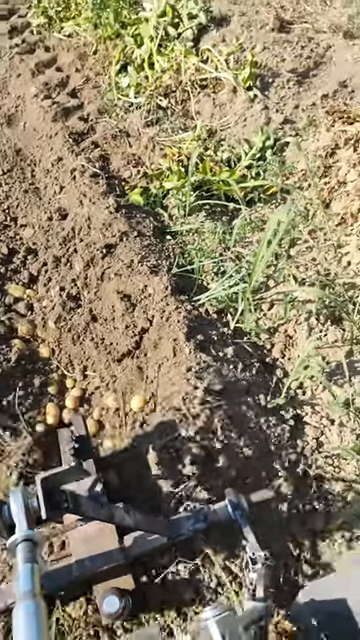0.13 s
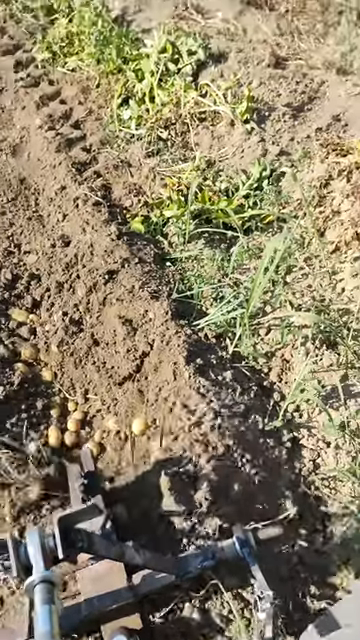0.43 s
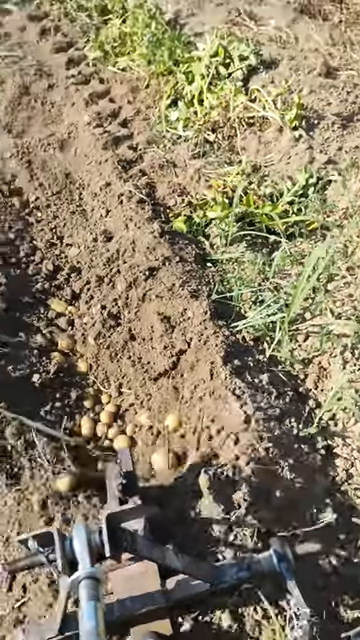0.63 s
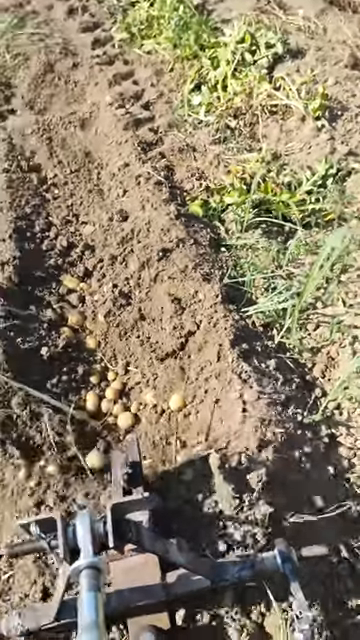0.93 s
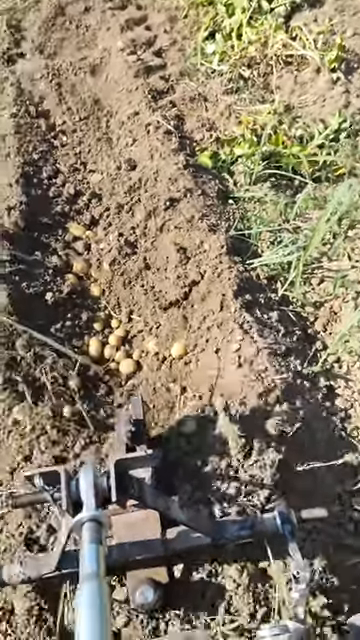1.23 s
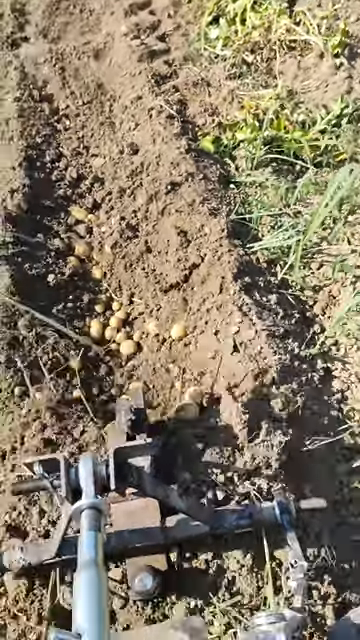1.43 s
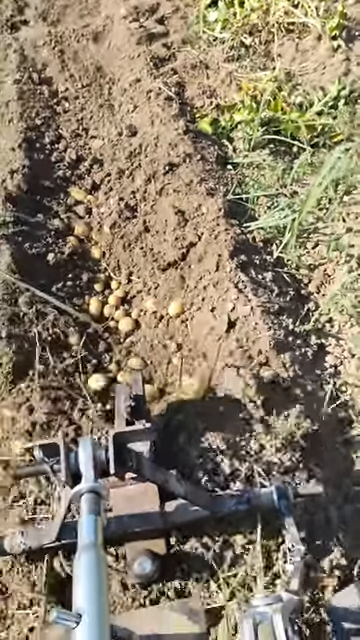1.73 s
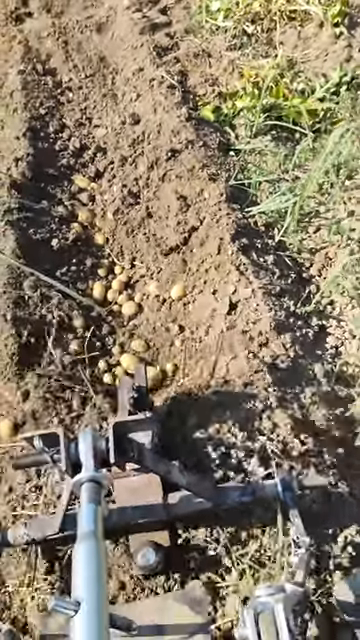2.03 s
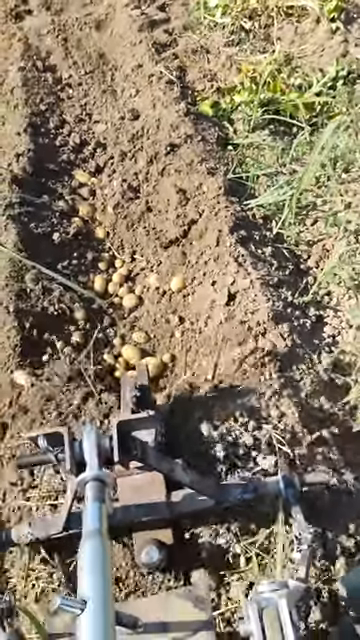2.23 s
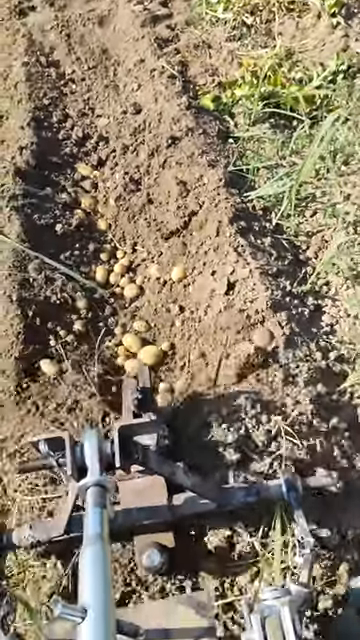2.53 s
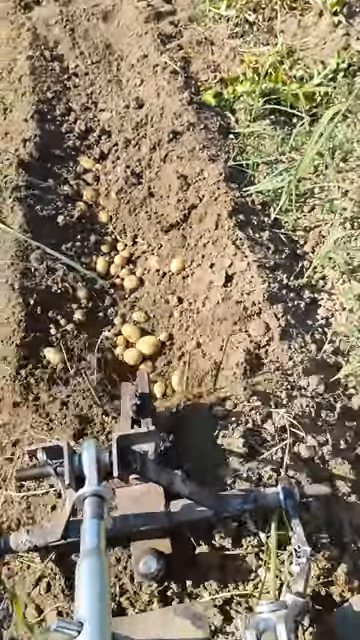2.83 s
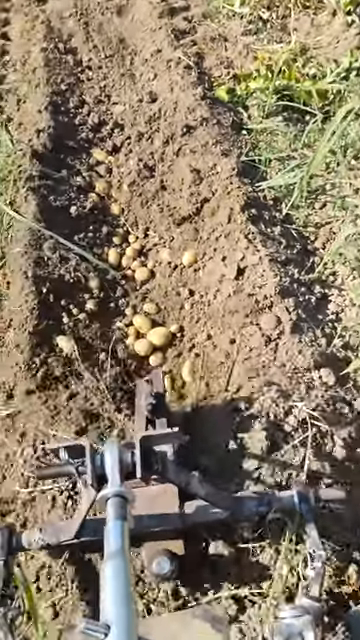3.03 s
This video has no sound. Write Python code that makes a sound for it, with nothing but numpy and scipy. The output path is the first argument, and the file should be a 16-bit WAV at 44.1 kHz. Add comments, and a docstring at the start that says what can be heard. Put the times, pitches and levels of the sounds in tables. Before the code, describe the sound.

Close outdoor stereo pickup of a tractor motor recovering from a brief slowdown, then droning steadily; behind it a metal digger buzzes and clinks, faint soil crumbs patter, and a stone scrapes just before two seconds.

```python
"""Tractor pulling a potato digger

A small diesel tractor drags a digger through dry soil. The engine recovers from a sag in speed:
steady tones make its hum and whine, shaped noise its knock and rumble. Jittered blows in step with
it rattle the digger's ringing steel frame. Crumbs patter, clods thump and a stone grinds and pings."""
import sys
import numpy as np
from scipy import signal
from scipy.fft import rfft, irfft, next_fast_len
from scipy.io import wavfile
from scipy.ndimage import uniform_filter1d, map_coordinates

SR = 44100
rng = np.random.default_rng(int(sys.argv[2]) if len(sys.argv) > 2 else 0)


def dump(signal):
    """Clip the signal to [-1, 1] and save it as 16-bit WAV at the path in sys.argv[1]."""
    limited = np.clip(np.atleast_2d(signal).T, -1, 1)
    pcm = np.round(limited * 32767).astype(np.int16)
    wavfile.write(sys.argv[1], SR, pcm)


N = 140238  # length [samples]


# Engine speed: (time [s], rate [firings per s])
SPEED = [(0.0, 21.06), (0.25, 21.7), (0.45, 21.03), (0.65, 23.2), (0.85, 25.0), (1.1, 25.77), (1.45, 25.57),
         (1.75, 24.91), (2.0, 24.38), (2.3, 25.2), (2.6, 25.91), (2.9, 26.1), (3.18, 25.66)]


def firing_count():
    """Adding up the firing rate gives the running count of firings, which times the whole engine."""
    return np.cumsum(curve(SPEED)) / SR


# Exhaust hum before the pipe and level curves: (multiple of the firing rate, level [dB])
HUM_ORDERS = [(2, -59), (3, -45), (5, -45.5), (6, -46), (7, -49.5), (9, -51.5), (10, -38.5), (11, -40.5),
              (14, -49.5), (15, -55.5)]
# Exhaust resonances that the hum slides through: (frequency [Hz], gain [dB])
PIPE = [(50, 0), (64, -7.5), (77, 0), (105, -2), (128, 0.5), (148, 2), (175, 0.5), (215, -14), (250, -1),
        (272, -17), (295, 6), (330, 1.5)]
# Rise and fall of the hum: (time [s], level [dB])
HUM_LEVEL = [(0, 1), (.25, -1.5), (.36, 1.5), (.74, 2.5), (.84, 1.5), (1.6, -2.5), (2.1, 0.5), (3.18, 1)]
# Gear whine before the radiation and level curves: (multiple of the firing rate, level [dB])
WHINE_ORDERS = [(41, -1), (54, -7), (55, 16), (58, -8), (69, -20)]
# Rise and fall of the whine: (time [s], level [dB])
WHINE_LEVEL = [(0, -70), (.85, -66), (1.0, -57), (1.85, -53), (2.1, -63), (2.45, -47.5), (3.18, -55)]
# Relative strength of each of the three cylinders' knocks: (level [dB])
CYLINDERS = [-1.6, -1.1, 1.9]
# Clacks of combustion and valve gear: (place between firings [0-1], relative level [dB])
CLACKS = [(.61, -9.5), (0.729, -13), (0.98, -11.5)]
# Tone colour of the knocking block: (frequency [Hz], relative level [dB per Hz])
BLOCK = [(400, -19), (950, 10.5), (1250, 1.5), (1800, 4.5), (2400, 2.5), (2900, -4), (3600, -19.5),
         (4600, -16.5), (5400, -20), (6500, -18), (9000, -28), (11000, -28), (12500, -23.5), (16000, -26)]
# Knocking, hardest while the engine picks up speed: (time [s], level [dB])
KNOCK_LEVEL = [(0, -40), (.55, -41), (.87, -39.5), (.95, -38.5), (1.4, -41.5), (2.4, -40), (3.18, -42)]
# Tone colour of the low rumble: (frequency [Hz], relative level [dB per Hz])
RUMBLE = [(20, -35), (36, -26), (62, -7), (100, -7), (140, -10.5), (200, -0.5), (270, 1), (330, -0.5),
          (450, -12), (680, 3), (900, -4.5), (1250, -7), (3000, -59.5)]
# Rise and fall of the rumble: (time [s], level [dB])
RUMBLE_LEVEL = [(0, -28.5), (.45, -35), (.7, -31.5), (.87, -32.5), (1.2, -29), (1.6, -28.5), (2.1, -29.5),
                (3.18, -30)]
KNOCK_BED, KNOCK_RISE_S, KNOCK_DECAY_S = .2, .0019, .007  # the bed is steady noise between knocks
CHUG_DB, CHUG_PLACE = 1, .27  # the rumble swells this much, at this place between firings


def engine(firings):
    """The exhaust hums and chugs, the gears whine; three cylinders clack in turn, one harder."""
    count = len(CYLINDERS)
    hits = np.zeros(N)
    for place, db in CLACKS:
        for k, strength in enumerate(CYLINDERS):
            turns = (firings - place - k) / count
            hits += amp(db + strength) * blows(turns, scatter_db=1, jitter_s=.0006)
    clacks = dying(hits, KNOCK_RISE_S, KNOCK_DECAY_S)
    knock = hiss(np.hypot(KNOCK_BED, 1.5 * clacks), BLOCK)
    chug = amp(CHUG_DB * np.cos(2 * np.pi * (firings - CHUG_PLACE)))
    rumble = hiss(chug, RUMBLE)
    hum = harmonics(firings, HUM_ORDERS, PIPE, waver_db=2.5)
    whine = harmonics(firings, WHINE_ORDERS, RADIATION, waver_db=4)
    tones = amp(curve(HUM_LEVEL)) * hum + amp(curve(WHINE_LEVEL)) * whine
    noises = amp(curve(KNOCK_LEVEL)) * knock + amp(curve(RUMBLE_LEVEL)) * rumble
    return tones + noises


def harmonics(firings, orders, colour, waver_db):
    """Slightly unsteady multiples of the firing rate, placed in the shared part only."""
    total, speed = np.zeros(N), curve(SPEED)
    for order, db in orders:
        tone = np.sqrt(2) * np.sin(2 * np.pi * (order * firings + rng.random()))
        level = db + along(colour, order * speed) + waver_db * wobble(4.92)
        total += amp(level) * tone
    return np.array([total, np.zeros(N)])


# Extra-hard knocks, before the trim: (time [s], level [dB])
HARD_KNOCKS = [(0.268, -35.5), (0.36, -39), (0.409, -33.5), (0.5442, -33), (0.5896, -34), (0.6779, -31.5),
               (0.9263, -33), (0.9584, -33), (2.2336, -36.5), (2.9297, -37), (3.0465, -36)]
# Resonance of the cylinder head, passed through twice: (frequency [Hz], width [Hz], gain [dB])
HEAD = [(2300, 680, 0)]
HARD_KNOCK_TRIM_DB = -3


def hard_knocks():
    """Now and then a crack against the cylinder head: a fading burst of noise at the head's pitch."""
    hits = hits_at(HARD_KNOCKS, HARD_KNOCK_TRIM_DB)
    noise = rng.standard_normal((2, N))
    return dying(hits, rise_s=.001, decay_s=.01) * ringing(ringing(noise, HEAD), HEAD)


# How well steel passes sound to the air: (frequency [Hz], gain [dB])
RADIATION = [(100, -29), (400, 3), (1700, -3.5), (2300, -30), (3000, -8.5), (6000, -27.5)]
# Weaker resonances of the frame: (frequency [Hz], width [Hz], gain [dB])
FRAME = [(439, 28, -3.5), (565.4, 31, 1.5), (635, 24, -2.5), (813, 100, -3), (1019, 25, -2), (1358, 49, -4),
         (1732, 52, -9)]
# Shaking of the frame, before the trim: (time [s], level [dB])
SHAKE = [(0, -27), (.14, -25.5), (.4, -32.5), (.6, -28.5), (.9, -34), (.95, -24), (1.12, -20.5),
         (1.27, -23), (1.96, -19), (2.11, -22), (2.33, -21.5), (2.6, -21.5), (2.75, -22.5), (3, -24),
         (3.18, -22)]
# Lower and upper ring, which surge separately, before the trims: (time [s], level [dB])
LOW_RING_LEVEL = [(0.0, -30), (0.04, -30.5), (0.34, -35), (0.63, -35.5), (0.88, -41.5), (0.98, -25.5),
                  (1.1, -36.5), (1.15, -26.5), (1.22, -32), (1.27, -25), (1.39, -30), (1.51, -24),
                  (1.6, -29), (1.65, -25), (1.72, -28.5), (1.96, -23.5), (2.04, -32), (2.06, -24),
                  (2.16, -35), (2.19, -26), (2.39, -25), (2.52, -31), (2.54, -24), (3.06, -30.5),
                  (3.13, -21.5), (3.18, -26)]
HIGH_RING_LEVEL = [(0.0, -33), (0.16, -38), (0.4, -51.5), (0.72, -34), (0.88, -58), (0.96, -25),
                   (0.99, -46), (1.07, -24.5), (1.1, -32), (1.31, -23.5), (1.38, -32), (1.41, -26),
                   (1.91, -27.5), (1.93, -29), (1.98, -21), (2.12, -35.5), (2.19, -32), (2.21, -33.5),
                   (2.45, -25.5), (2.82, -34.5), (2.84, -29.5), (2.91, -29.5), (2.95, -20), (2.99, -36),
                   (3.03, -24.5), (3.18, -31.5)]
# Resonances of the two rings: (frequency [Hz], width [Hz], gain [dB])
LOW_RING = [(486.8, 15.5, 3), (516.8, 12, 4.5)]
HIGH_RING = [(771, 17, 1.5), (815.6, 14, -5.5)]
# Engine harmonics that each ring sings with: (multiple of the firing rate, relative level [dB])
LOW_SUNG = [(19, 0), (20, 0)]
HIGH_SUNG = [(30, 0), (31, -5)]
# Tone colour of steel on steel: (frequency [Hz], level [dB per Hz])
STEEL = [(1500, 5), (2800, -4.5), (3430, 15.5), (4200, -26), (5400, -8), (6600, 7), (8000, 4), (10300, 2),
         (11200, -7), (12500, -3.5), (16000, -4)]
# Steel-on-steel chatter: (time [s], level [dB])
CHATTER = [(0, -84), (.88, -96), (.97, -59), (1.18, -58.5), (1.3, -51.5), (1.38, -55.5), (1.5, -51.5),
           (1.8, -49), (1.97, -45.5), (2.08, -61), (2.22, -58), (2.33, -50.5), (2.59, -50.5), (2.7, -59.5),
           (3.05, -60.5), (3.18, -50)]
FRAME_TRIM_DB, LOW_RING_TRIM_DB, HIGH_RING_TRIM_DB = -6, 1.5, .5
CONTACTS_PER_FIRING, CONTACT_PLACE = 6, .34  # the place is a fraction of the gap between contacts
TICK_BED, TICK_DECAY_S = .2, .00033  # the bed is steady noise under the ticks


def digger(firings):
    """Loose joints strike in step with the engine: each contact ticks and rings the frame."""
    turns = CONTACTS_PER_FIRING * firings - CONTACT_PLACE
    contacts = blows(turns, scatter_db=4, jitter_s=.0009)
    push_envelope = .42 + dying(contacts, rise_s=.00055, decay_s=.0019)
    push = push_envelope * rng.standard_normal((2, N))
    drone = unit(filtered(ringing(push, FRAME), lambda hz: amp(along(RADIATION, hz))))
    low = ring(push, firings, LOW_RING, LOW_SUNG)
    high = ring(push, firings, HIGH_RING, HIGH_SUNG)
    ticks = hiss(TICK_BED + dying(contacts, rise_s=.00005, decay_s=TICK_DECAY_S), STEEL)
    rings = amp(curve(LOW_RING_LEVEL) + LOW_RING_TRIM_DB) * low
    rings = rings + amp(curve(HIGH_RING_LEVEL) + HIGH_RING_TRIM_DB) * high
    return rings + amp(curve(SHAKE) + FRAME_TRIM_DB) * drone + amp(curve(CHATTER)) * ticks


RING_WIDTH_HZ, SUNG_DB = 139, -9  # width of the extra resonance; singing against rattling


def ring(push, firings, modes, orders):
    """Two close frame resonances ring, driven by the contacts and by engine harmonics."""
    main_hz = modes[0][0]
    rattled = ringing(ringing(push, modes), [(main_hz, RING_WIDTH_HZ, 0)])
    sung = ringing(harmonics(firings, orders, RADIATION, waver_db=3), modes)
    return rubbed(unit(rattled + amp(SUNG_DB) * sung))


FRICTION = .55  # 0 leaves the swings alone, 1 nearly flattens them


def rubbed(x):
    """Friction in the joints evens out the widest swings: loud stretches are turned down."""
    power = np.abs(uniform_filter1d(x ** 2, size=2600, axis=-1)) + 1e-6  # size in samples
    return unit(x / power ** (FRICTION / 2))


# The hardest steel contacts, before the trim and the steel colour: (time [s], level [dB])
CLINKS = [(0.309, -52), (0.451, -51), (0.546, -50), (0.761, -51), (0.9183, -48), (1.4257, -41),
          (1.5165, -40), (1.5753, -40), (1.6337, -37), (1.6536, -39), (1.7275, -39), (1.7734, -39),
          (1.8881, -35), (1.9205, -36), (2.4708, -40)]
CLINK_TRIM_DB, CLINK_DECAY_S = -2, .0004


def clinks():
    """Some joints slam harder than the rest: very short noise bursts with the colour of steel."""
    hits = hits_at(CLINKS, CLINK_TRIM_DB)
    bursts = dying(hits, rise_s=.0001, decay_s=CLINK_DECAY_S) * rng.standard_normal((2, N))
    return filtered(bursts, lambda hz: amp(along(STEEL, hz)))


# Grinding of the stone along the share: (time [s], level [dB])
GRIND_LEVEL = [(1.65, -80), (1.8, -55), (1.89, -49.5), (1.97, -43), (2.025, -52), (2.06, -74), (2.1, -110)]
# Ring of the share (the digging blade), passed through twice: (frequency [Hz], width [Hz], gain [dB])
SHARE = [(3440, 420, 0)]
PING_S, PING_DB, PING_DECAY_S = 1.9755, -26, .003  # level is before the ping's rise and decay


def stone():
    """A stone grinds ever harder along the share, then slips off with a ping and fades."""
    grains = .5 + crumbs(500, scatter_db=3, decay_s=.002)
    scrape = grains * rng.standard_normal((2, N))
    grind = ringing(ringing(scrape, SHARE), SHARE)
    ping = struck(PING_S, SHARE[0][0], rise_s=.0018, decay_s=PING_DECAY_S)
    return amp(curve(GRIND_LEVEL)) * grind + amp(PING_DB) * ping


# Tone colour of falling soil: (frequency [Hz], relative level [dB per Hz])
SOIL = [(500, 13), (1500, -5), (3000, 26), (4500, -18), (6000, -4.5), (10000, -21), (16000, -1)]
# Clods landing on the digger, before the trim, rise and decay: (time [s], level [dB], pitch [Hz])
THUMPS = [(0.056, -26, 245), (0.327, -20, 263), (0.376, -21, 299), (0.696, -25, 142), (0.741, -20, 253),
          (1.127, -19, 297), (2.057, -24.5, 256), (2.842, -26, 255)]
SOIL_DB, CRUMBS_PER_S = -62, 160
THUMP_TRIM_DB, THUMP_RISE_S, THUMP_DECAY_S = 1, .005, .013


def soil():
    """Dry crumbs patter down as noise specks; heavier clods thump as short low tones."""
    patter = hiss(.15 + crumbs(CRUMBS_PER_S, scatter_db=4, decay_s=.002), SOIL)
    clods = np.zeros((2, N))
    for s, db, hz in THUMPS:
        clods += amp(db + THUMP_TRIM_DB) * struck(s, hz, THUMP_RISE_S, THUMP_DECAY_S)
    return amp(SOIL_DB) * patter + clods


def crumbs(rate, scatter_db, decay_s):
    """The envelope of small impacts at random times, about rate a second, uneven in size."""
    hits = (rng.random(N) < rate / SR) * amp(scatter_db * rng.standard_normal(N))
    return dying(hits, rise_s=.0001, decay_s=decay_s)


# Likeness of left and right for two equally strong noises: (frequency [Hz], likeness [0-1])
ALIKE = [(40, .8), (120, .93), (300, .95), (600, .94), (1000, .82), (1500, .7), (2400, .7), (3200, .4),
         (8000, .3), (15000, .15)]
# Loudness of left over right: (frequency [Hz], left minus right [dB])
BALANCE = [(60, 2.5), (125, -2.3), (300, -2.5), (520, -2), (800, -4.5), (1100, -2), (1400, -1),
           (2400, -3.5), (4500, 0), (8000, -5), (15000, -1)]
# How much later the left hears: (frequency [Hz], delay [s])
LEFT_LAG = [(300, .00041), (520, .00031), (780, .00032), (1400, .00042), (3000, .00045)]


def ports(pair):
    """A shared and an unshared part reach two listening points; the right one hears first."""
    def turn(hz):
        return np.arccos(np.clip(along(ALIKE, hz), -1, 1)) / 2

    half = np.array([[.5], [-.5]])  # each side takes half of the difference

    def placing(hz):
        lag = np.exp(-2j * np.pi * hz * half * along(LEFT_LAG, hz))
        return amp(half * along(BALANCE, hz)) * lag

    mid, side = filtered(pair, lambda hz: np.array([np.cos(turn(hz)), np.sin(turn(hz))]))
    return filtered(np.array([mid + side, mid - side]), placing)


def amp(db):
    """Decibels to gain."""
    return 10 ** (np.asarray(db) / 20)


def unit(x):
    """Scaled to an average (rms) strength of 1."""
    return x / np.sqrt(np.mean(x ** 2) + 1e-20)


def along(points, hz):
    """Reads (frequency, value) points at any frequency, on a log axis."""
    f, v = np.transpose(points)
    return np.interp(np.log(hz + 1), np.log(f + 1), v)


def curve(rows):
    """Joins (time, value) points into one value per sample."""
    return np.interp(np.arange(N) / SR, *np.transpose(rows))


def wobble(rate):
    """A smooth random curve with rate random points a second."""
    knots = rng.standard_normal(int(N * rate / SR) + 4)
    return map_coordinates(knots, [np.arange(N) * rate / SR])


def filtered(x, response):
    """Multiplies each frequency of x by the response there."""
    m = next_fast_len(N + SR // 2)  # spare room so that tails do not wrap round
    return irfft(rfft(x, m) * response(np.fft.rfftfreq(m, 1 / SR)), m)[..., :N]


def ringing(x, modes):
    """Passes x through resonances, each boosting a narrow band of pitches, at rms 1."""
    def response(f):
        return sum(amp(db) * 1j * f * w / (c * c - f * f + 1j * f * w) for c, w, db in modes)
    return unit(filtered(x, response))


def hiss(envelope, spectrum):
    """Two unrelated noises under one envelope, coloured, at rms 1."""
    noise = envelope * rng.standard_normal((2, N))
    return unit(filtered(noise, lambda hz: amp(along(spectrum, hz))))


def blows(turns, scatter_db, jitter_s):
    """One impulse at each whole turn, uneven in size and time."""
    at = np.flatnonzero(np.diff(np.floor(turns)) > 0)
    chance = rng.standard_normal((len(at), 2))
    at = np.clip(at + chance[:, 0] * jitter_s * SR, 0, N - 1).astype(int)
    return np.bincount(at, amp(scatter_db * chance[:, 1]), N)


def hits_at(rows, trim_db):
    """One impulse for each (time, level) row."""
    s, db = np.transpose(rows)
    return np.bincount((s * SR).astype(int), amp(db + trim_db), N)


def dying(hits, rise_s, decay_s):
    """The envelope of impulses that each rise and die away."""
    t = np.arange(SR // 8) / SR
    return signal.fftconvolve(hits, (1 - np.exp(-t / rise_s)) * np.exp(-t / decay_s))[:N]


def struck(s, hz, rise_s, decay_s):
    """One fading tone from time s, placed in the shared part only."""
    t = np.maximum(np.arange(N) / SR - s, 0)
    tone = np.sin(2 * np.pi * hz * t) * (1 - np.exp(-t / rise_s)) * np.exp(-t / decay_s)
    return np.array([tone, np.zeros(N)])


def scene():
    """The engine's firings time the hum, the clacks and the digger's rattle; the rest is added."""
    firings = firing_count()
    machine = engine(firings) + hard_knocks() + digger(firings) + clinks()
    return ports(machine + stone() + soil())


TOP_HZ = 15850


def record(dry):
    """Nothing is kept above the top frequency."""
    return filtered(dry, lambda hz: hz < TOP_HZ)


dry = scene()
out = record(dry)
dump(out)
```